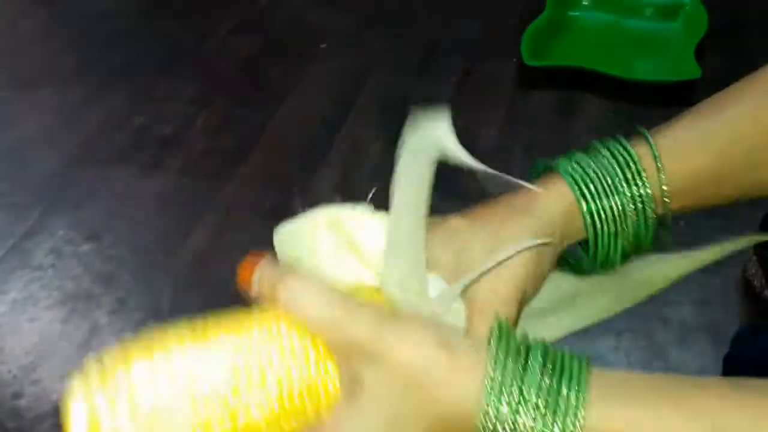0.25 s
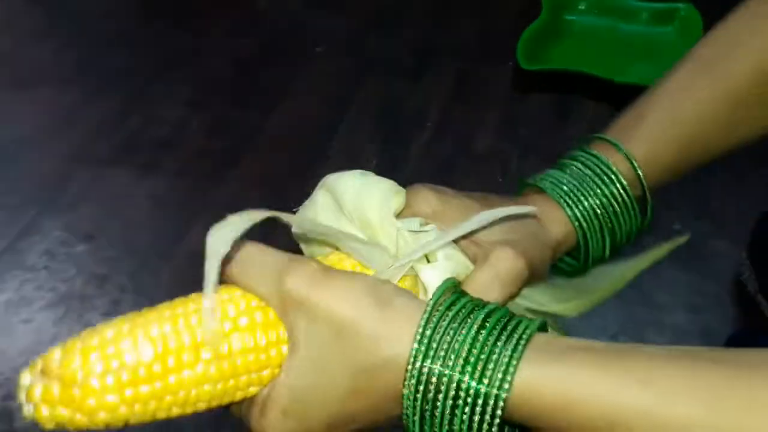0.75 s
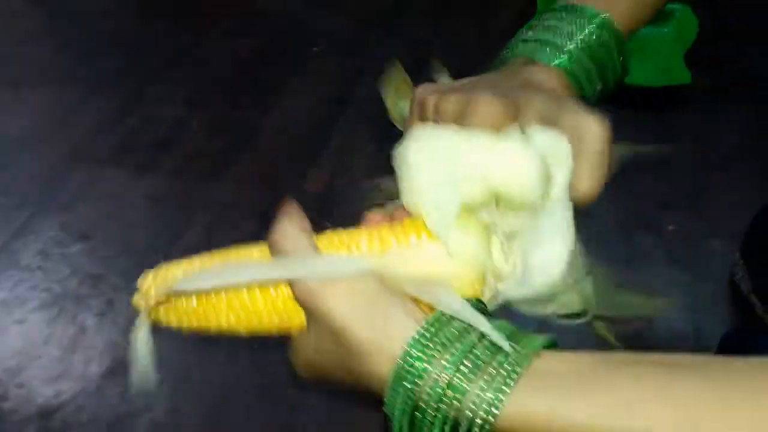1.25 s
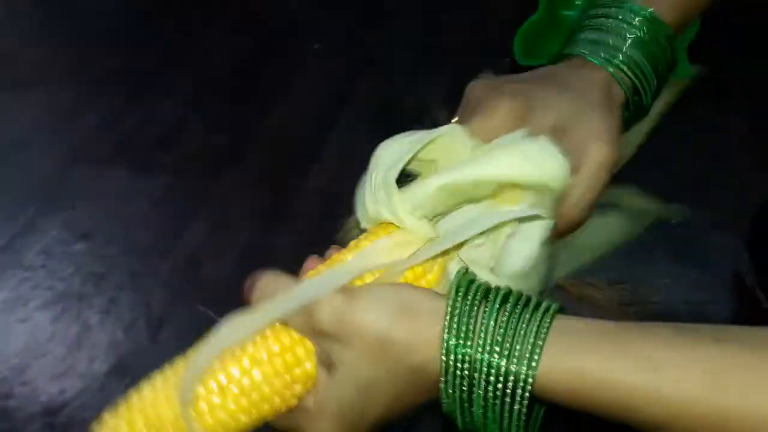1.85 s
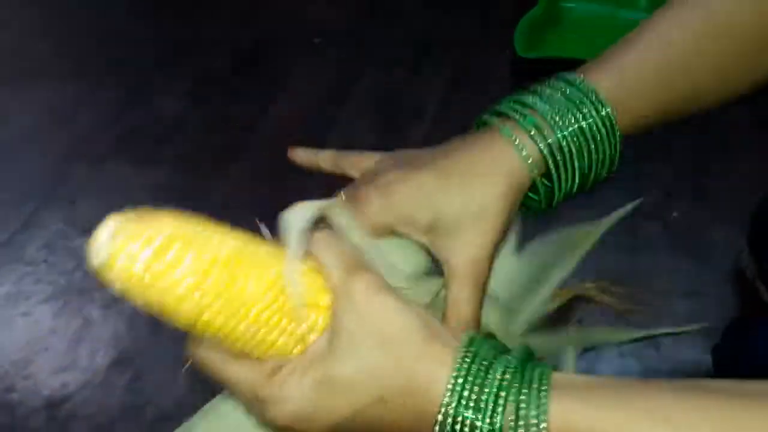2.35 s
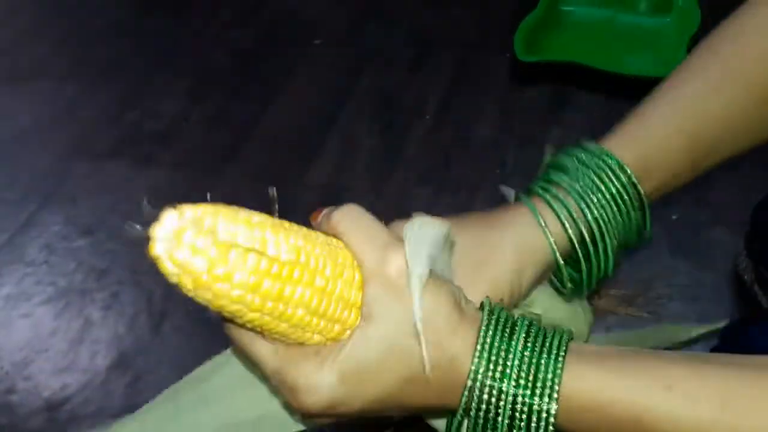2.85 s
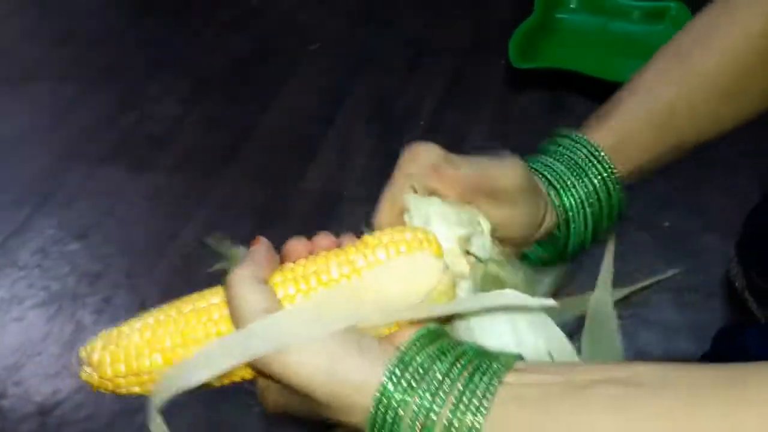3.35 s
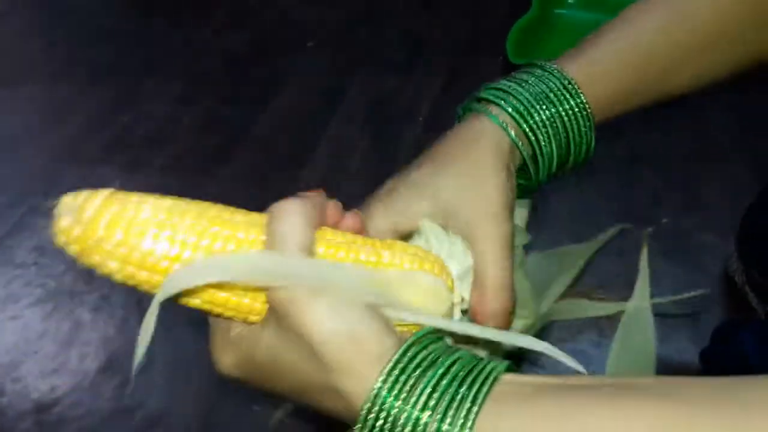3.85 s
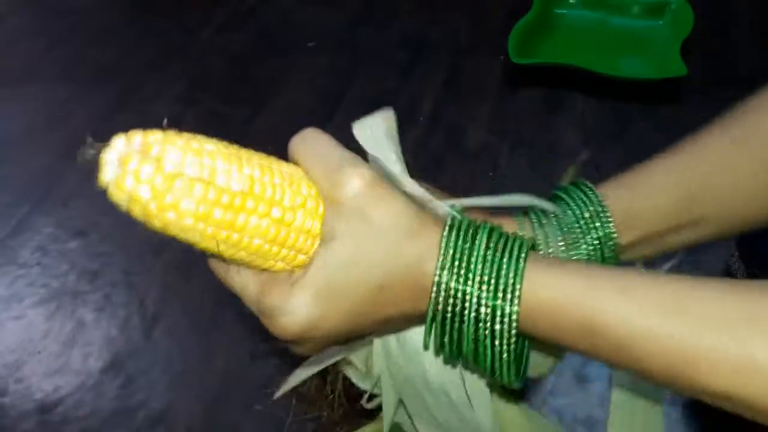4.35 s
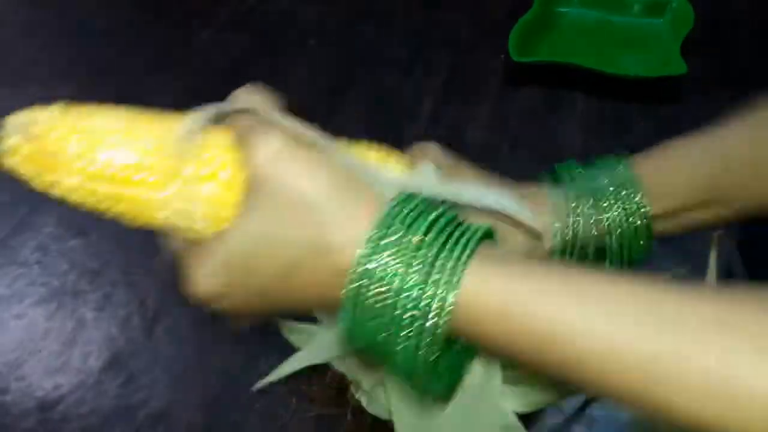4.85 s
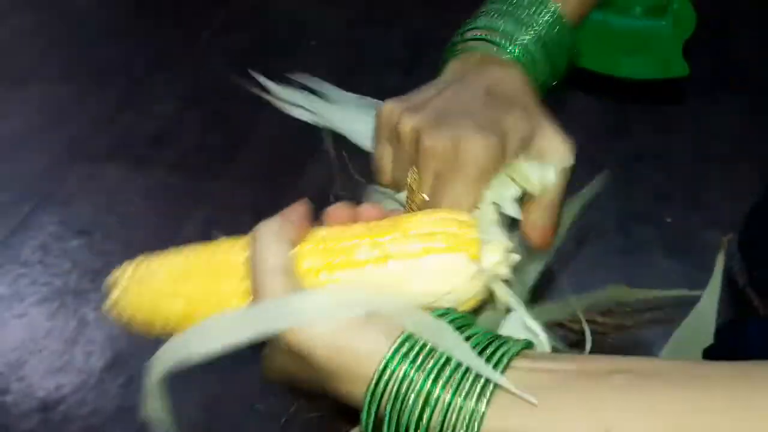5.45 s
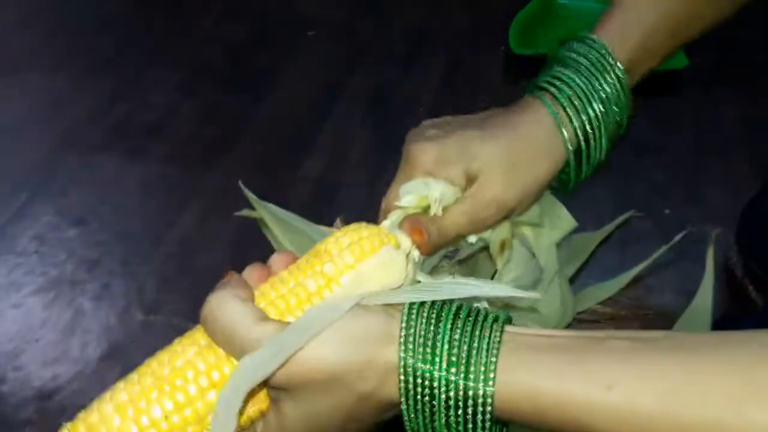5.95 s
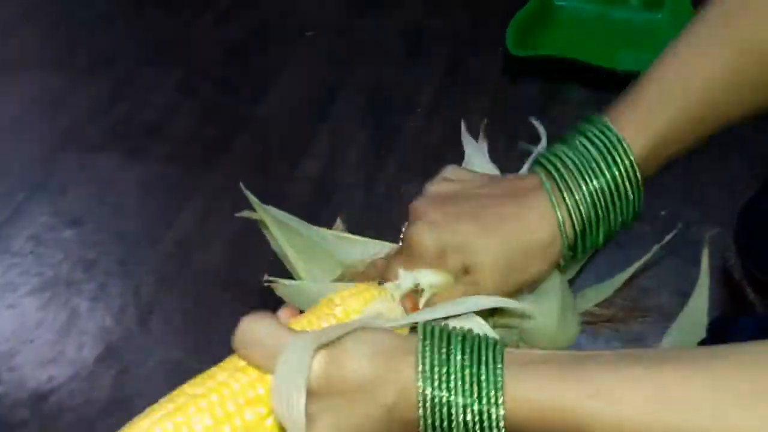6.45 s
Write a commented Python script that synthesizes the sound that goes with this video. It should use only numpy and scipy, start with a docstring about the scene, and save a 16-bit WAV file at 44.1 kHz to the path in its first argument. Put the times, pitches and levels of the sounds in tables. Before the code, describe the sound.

Hands strip husk from a corn cob in a hard-floored room: dry rustling, cracking ribs, short tears, leafy squeaks, light glass bangle ticks.

```python
"""In a hard-floored room, close by, hands pull the husk leaves off an ear of corn.
Crackling noise makes the leaves rustle, and noise around one pitch makes the squeezed bundle resonate.
Short noise bursts are snapping ribs, dense clicks are ripping fibres, unsteady tones are squeaking leaves.
Glass bangles ring on the wrists, filtered noise thuds in the cob, and echoes and a soft hush fill the room."""
import sys
import numpy as np
from scipy import signal
from scipy.fft import rfft, irfft
from scipy.io import wavfile

SR = 44100
rng = np.random.default_rng(int(sys.argv[2]) if len(sys.argv) > 2 else 0)


def file_out(sig):
    """Save sig as 16-bit WAV at sys.argv[1]."""
    # one column per channel
    cols = np.atleast_2d(sig).T
    # limit, then scale
    lim = np.clip(cols, -1, 1)
    pcm = np.round(lim * 32767).astype(np.int16)
    wavfile.write(sys.argv[1], SR, pcm)


N = 295029
TIME = np.arange(N) / SR

# All event levels below are relative: each source also has an overall level of its own.
# a hand pulls or gathers the leaves: start_s, length_s, crackle_db, rub_db, swell_db (change over the length)
STROKES = [(0, 0.098, -55, -45.5, -1), (0.163, 0.062, -41.5, -39.5, -7), (0.228, 0.16, -48.5, -43.5, 0),
           (0.361, .1, -38, -39, -1), (0.489, .29, -48, -44, 0), (0.873, 0.056, -52.5, -51, 0),
           (1.021, 0.28, -50.5, -47.5, -28), (1.367, 0.14, -47.5, -52, 4), (1.503, 0.064, -42, -44, 2),
           (1.6, 0.13, -49.5, -53.5, 3), (1.707, 0.066, -41, -44, -1), (1.865, .28, -54.5, -54.5, 1),
           (2.31, 0.74, -53, -53.5, -4), (2.686, 0.22, -37, -43, 0), (2.985, 0.079, -49.5, -47.5, -2),
           (3.069, 0.22, -43.5, -47, -13), (3.303, 0.14, -48, -47, -4.5), (3.517, .12, -51.5, -52, -1),
           (3.635, .04, -45.5, -46, -7), (3.873, 0.12, -43.5, -51.5, 7.5),
           (3.991, 0.19, -40.5, -48.5, -5.5), (4.25, 0.077, -36.5, -63, -14), (4.41, .2, -42.5, -55, 1),
           (4.63, .11, -50.5, -54, -8), (4.887, .34, -43.5, -51, 1.5), (5.508, 0.098, -57, -61.5, -4),
           (5.83, .12, -54, -77, 5.5), (6.385, 0.053, -43.5, -70, 0), (6.567, 0.014, -40, -53, -5)]
STROKE_ATTACK_S, STROKE_RELEASE_S = 0.017, 0.026
# leaves shifting in the grip between pulls: time_s, rub_db
GRIP = [(0, -43.5), (.9, -57), (1.85, -64), (2.7, -51.5), (3.7, -55), (4.4, -57), (5.35, -56), (5.45, -91),
        (6.1, -75), (6.4, -57), (6.68, -57)]
GRIP_CRACKLE_DB = -1.5  # relative to that rub
# how far the work has gone, from thick soft husk (0) to bare brittle stalk (1): time_s, share (0-1)
BARENESS = [(0, 0.11), (1.2, .03), (3.1, 0.27), (5.3, 0.3), (5.9, 0.74), (6.6, 1)]
# fine fibres splitting, relative to the crackle, and how much is added at the bare stalk
FIZZ_DB, BARE_FIZZ_DB = -14, 6.5
# spectrum of crackling leaves: pitch_hz, level_db (per Hz)
CRACKLE_SPECTRUM = [(100, -43), (500, -23.5), (1000, -19.5), (1500, -16), (2600, -9), (4000, -8.5),
                    (5500, -3.5), (6500, 1.5), (7200, -8.5), (8000, -22.5), (9000, -33), (16000, -36.5)]
# spectrum of leaf rubbing on leaf: pitch_hz, level_db (per Hz)
RUB_SPECTRUM = [(60, -17.5), (200, -6.5), (600, -7), (950, -6.5), (1250, 2), (1480, 1), (1900, -1.5),
                (2800, -1.5), (4000, -6), (6500, -31), (8000, -19), (16000, -34.5)]
# the thick bundle of leaves resonating as it is squeezed: start_s, length_s, level_db, pitch_hz
SQUEEZES = [(0, 0.23, -52.5, 1472), (0.198, 0.22, -43.5, 1422), (.48, 0.35, -48, 1419),
            (0.925, .14, -47.5, 1440), (1.355, 0.16, -50, 1339)]
# ribs and stalk breaking: start_s, level_db, thickness (0-1)
SNAPS = [(0.3593, -31, 0.6), (0.363, -35, 0.9), (0.444, -34, 0.6), (.571, -33.5, 0.73), (0.648, -37, .75),
         (0.688, -33, 0.64), (0.7294, -38.5, 0.93), (0.9145, -38.5, 0.63), (1.0373, -15.5, 0.99),
         (1.0543, -28, 1), (1.4653, -35.5, .05), (1.5197, -34.5, 0.7), (1.6664, -31, 0.7),
         (2.705, -35.5, .05), (2.7346, -26.5, 0.2), (2.7711, -24.5, .02), (2.9876, -33, 0.5),
         (3.0777, -25, 0.5), (3.1118, -14, .8), (3.1279, -28.5, 1), (3.1727, -17.5, 0.62),
         (3.1962, -24, 0.78), (3.3125, -34.5, 0.1), (3.333, -40, 0.1), (3.972, -27, 0), (3.999, -27.5, 0.6),
         (4.0731, -34.5, 0.6), (4.12, -34.5, 0.5), (4.142, -26, 0.1), (4.156, -35, 0.05),
         (4.249, -22.5, .5), (4.279, -41, 0), (4.292, -28, 0.2), (4.3144, -26, .02), (4.4228, -29.5, .5),
         (4.533, -37.5, .4), (4.568, -28, 0.24), (4.8894, -28.5, 0.27), (5.0602, -21, 0.54),
         (5.0895, -20, 0.66), (5.148, -26, 0.4), (5.2974, -34, 0.2), (5.5618, -45, 0.35),
         (5.7803, -42.5, .05), (5.8357, -44, .25), (5.9253, -40.5, 0.3), (6.3944, -22, 0.75),
         (6.4114, -34, 0.1), (6.5633, -32, 0.74), (6.5664, -30.5, 0.74)]
# four registers of a snap: low_hz, high_hz, thin_db (thin fibre), thick_db (thick rib),
# bare_db (added at the bare stalk)
SNAP_BANDS = [(1157, 1820, -28.5, 2.5, -10.5), (2390, 5000, -14.5, -1, 4), (5250, 7130, 0.5, -2.5, 1),
              (8060, 14100, -15.5, -17.5, 8)]
# lesser fibres that give way at random during a pull, at a level relative to its crackle
SMALL_SNAPS_PER_S, SMALL_SNAP_THICKNESS = 7, 0.17
SMALL_SNAP_DB, SMALL_SNAP_SPREAD_DB = 5.5, 2
# a leaf tearing off at its base: start_s, length_s, level_db, fall_db (over the length),
# leaf_hz (resonance), width_hz (of the resonance), leaf_db (resonance level)
RIPS = [(1.054, 0.071, -19, 12.5, 1500, 288, -5.5), (3.112, 0.01, -34.5, 17, 2230, 910, 17),
        (3.124, 0.07, -27, 6.5, 2600, 1102, -0.5), (5.086, 0.043, -36.5, 17, 1176, 257, 2.5),
        (5.099, 0.047, -33.5, 1.5, 2820, 450, -13)]
# spectrum of tearing fibres: pitch_hz, level_db (per Hz)
TEAR_SPECTRUM = [(80, -15.5), (300, -23), (650, -8.5), (1000, -3.5), (1400, -14), (2000, 3.5), (2700, 4.5),
                 (4200, 1.5), (6000, 8.5), (6800, 3), (8000, -19), (10000, -12), (16000, -29)]
# knocks through the cob, from the hands or from a breaking rib: start_s, level_db, centre_hz,
# t60_s (time to fall by 60 dB)
BUMPS = [(.175, -46.5, 208, 0.099), (.185, -43, 676, 0.026), (0.299, -55, 212, 0.14), (.39, -54, 297, 0.09),
         (.515, -45, 706, 0.045), (1.036, -29, 540, 0.02), (1.04, -41, 280, 0.14), (1.056, -42, 480, 0.12),
         (1.667, -44, 614, 0.013), (3.111, -24.5, 630, 0.0081), (5.091, -39, 760, 0.024),
         (5.09, -43.5, 180, 0.055), (5.487, -57, 109, 0.054), (6.569, -36.5, 450, 0.015)]
# leaf slipping on leaf: start_s, length_s, first_hz and last_hz (slips per second), level_db,
# uneven (unsteadiness, 0-1), octave_db (overtone relative to the tone)
SQUEAKS = [(0.211, 0.05, 3965, 4090, -35.5, 0.01, -36), (0.24, 0.0606, 4900, 5230, -34.5, 0.14, -22),
           (0.802, 0.063, 3100, 3050, -47, .012, -28), (1.837, 0.096, 3035, 3010, -50.5, 0.025, -2),
           (2.478, 0.081, 4476, 4680, -39.5, 0.01, -29), (3.759, 0.096, 3454, 3310, -43, 0.03, 3),
           (4.263, 0.058, 2500, 1960, -41.5, 0.13, -5), (4.307, 0.14, 2966, 3170, -41.5, 0.04, -20),
           (6.14, 0.12, 3735, 3330, -44, 0.12, -12), (6.144, 0.059, 2920, 2755, -50, 0.04, -0.5),
           (6.175, 0.079, 4850, 4600, -36.5, 0.035, -44), (6.228, 0.068, 4190, 4110, -35, 0.01, -18),
           (6.198, 0.11, 3510, 3380, -47, 0.06, -17), (6.16, .13, 5840, 5640, -52, .12, -30),
           (6.218, 0.084, 3030, 2920, -44, 0, -8.5), (6.302, 0.031, 4160, 4320, -42, 0.2, -28),
           (6.364, 0.058, 3000, 2960, -49, 0.05, 1)]
# bangles jostling: start_s, length_s, level_db, lower_db (added to the lower modes)
JINGLES = [(0.007, 0.061, -59, 1), (0.098, 0.012, -45.5, -6), (.36, 0.15, -58, -6), (0.662, 0.023, -52, -8),
           (1.064, 0.045, -39, -4), (1.21, 0.079, -52, 1.5), (1.569, 0.056, -54, -9),
           (2.263, 0.015, -47.5, 5), (2.329, 0.023, -51, -2), (2.354, 0.01, -40.5, 5),
           (2.389, 0.071, -54, -7), (2.508, 0.074, -56.5, 2), (3.65, 0.011, -55, 11),
           (4.69, 0.075, -56, -5), (4.907, 0.14, -47.5, -2), (6.172, 0.18, -66.5, 7)]
# modes of a glass bangle, before each ring is detuned: pitch_hz, level_db, t60_s
BANGLE_MODES = [(2930, -11, 0.048), (5220, -4.5, 0.0097), (6190, 4, 0.027), (10100, -9, 0.014),
                (11100, -2.5, 0.056), (11900, -5, 0.032), (13300, -10, .02), (14100, -10, .02),
                (15200, -8, .015)]
# how long the room echoes at each pitch: pitch_hz, t60_s
ROOM_T60 = [(150, 0.56), (1500, 0.4), (4000, 0.45), (6500, 0.36), (14000, 0.5)]
# stereo width given to the echo tail: pitch_hz, level_db (per Hz)
TAIL_WIDTH = [(100, -11), (500, 12), (1200, -37), (5000, -44), (7200, -6), (8200, 11), (16000, 12)]
# spectrum of the room's hush: pitch_hz, level_db (per Hz)
ROOM_TONE = [(20, -13), (60, -16), (110, -2), (170, 2), (280, -5), (650, -3.5), (1300, -8.5), (2500, -12),
             (4500, -17), (6500, -12.5), (8000, -35), (16000, -23)]
# stereo width given to the hush: pitch_hz, level_db (per Hz)
TONE_WIDTH = [(20, -7), (60, -6), (150, -1.5), (400, -1.5), (900, -2), (2000, -6.5), (6000, -12.5),
              (9000, -31), (16000, -64)]
ROOM_TONE_DB = -56
CUTOFF_HZ = 16100


def from_db(db):
    """Turn decibels into a plain gain."""
    return 10 ** (np.asarray(db) / 20)


def rms_one(x):
    """Scale a sound to an average strength (rms) of one."""
    return x / np.sqrt(np.mean(x ** 2) + 1e-20)


def at_hz(points, hz):
    """Read a table on a log-frequency axis."""
    knots, values = np.transpose(points)
    return np.interp(np.log(np.maximum(hz, 1)), np.log(knots), values)


def band(x, low, high, order=2):
    """Keep only the pitches between low and high, in Hz."""
    sections = signal.butter(order, [low, high], "band", fs=SR, output="sos")
    return signal.sosfilt(sections, x + 1e-18)  # the tiny offset keeps silent stretches quick to compute


def ring(x, hz, t60):
    """One damped mode: struck by x, it rings at one pitch and falls by 60 dB in t60 seconds."""
    radius = from_db(-60 / (t60 * SR))
    angle = 2 * np.pi * hz / SR
    return signal.lfilter([1, 0, -1], [1, -2 * radius * np.cos(angle), radius * radius], x + 1e-18)


def colour(x, spectrum, size=2048):
    """Causal (minimum-phase) filter with the shape of the given spectrum and a power gain of one."""
    level_db = at_hz(spectrum, np.fft.rfftfreq(size, 1 / SR))
    cepstrum = irfft(np.log(from_db(level_db)))
    # folding the cepstrum forward in time makes the filter causal
    cepstrum[1:size // 2] *= 2
    cepstrum[size // 2 + 1:] = 0
    response = irfft(np.exp(rfft(cepstrum)))
    return signal.fftconvolve(x, response / np.linalg.norm(response))[:len(x)]


def drift(per_s, n):
    """Smooth chance with a spread of one, taking per_s new random values each second."""
    steps = np.arange(n) * per_s / SR
    return rms_one(np.interp(steps, np.arange(n), rng.standard_normal(n)))


def cracks(per_s, spread_db, n):
    """Clicks at random moments, most of them faint and a few strong, with an rms of one."""
    strength_db = spread_db * np.minimum(rng.exponential(1, n), 4)
    sizes = from_db(strength_db) * rng.choice([-1, 1], n)
    return rms_one(sizes * (rng.random(n) < per_s / SR))


def add(out, s, sound):
    """Mix a sound in at its time in seconds."""
    start = max(round(s * SR), 0)
    out[start:start + len(sound)] += sound[:N - start]


def stroke(s, length, swell_db=0):
    """Force of one hand movement: a quick rise, a hold that swells or sags, a release."""
    t = TIME - s
    rise = np.clip(t / STROKE_ATTACK_S, 0, 1)
    hold = from_db(swell_db * (np.clip(t / length, 0, 1) - .5))
    release = np.exp(-np.clip((t - length) / STROKE_RELEASE_S, 0, 20))
    return rise * hold * release


def bareness(s):
    """How far the work has gone at these times, from soft husk (0) to bare stalk (1)."""
    return np.interp(s, *np.transpose(BARENESS))


def rustle(crisp_db=-0.4, hollow_db=-2.5, clump_db=2.5):
    """Bending leaves crackle in clumps; leaf sliding over leaf gives a smoother, duller rub."""
    rub_force = from_db(np.interp(TIME, *np.transpose(GRIP)))
    crackle_force = from_db(GRIP_CRACKLE_DB) * rub_force
    # the stronger of grip and strokes wins at each moment
    for s, length, crackle_db, rub_db, swell_db in STROKES:
        force = stroke(s, length, swell_db)
        crackle_force = np.maximum(crackle_force, from_db(crackle_db) * force)
        rub_force = np.maximum(rub_force, from_db(rub_db) * force)

    clumps = from_db(clump_db * drift(160, N))
    crackle = rms_one(cracks(per_s=3000, spread_db=1.0, n=N) * clumps)
    fizz_gain = from_db(FIZZ_DB + BARE_FIZZ_DB * bareness(TIME))
    fizz = fizz_gain * rms_one(band(crackle, 8800, 17500, order=3))
    crisp = crackle_force * (colour(crackle, CRACKLE_SPECTRUM) + fizz)

    rub = cracks(per_s=6000, spread_db=1.5, n=N)
    hollow = rub_force * colour(rub, RUB_SPECTRUM)
    return from_db(crisp_db) * crisp + from_db(hollow_db) * hollow


def bundle(width_hz=130, bundle_db=-3.5):
    """Friction excites the hollow of the bunched leaves, whose pitch differs from squeeze to squeeze."""
    out = np.zeros(N)
    friction = rng.standard_normal(N) + 1j * rng.standard_normal(N)
    swell = signal.sosfilt(signal.butter(2, width_hz, fs=SR, output="sos"), friction)
    for s, length, level_db, hz in SQUEEZES:
        # shifting slow noise up in pitch gives a narrow band around hz
        resonance = rms_one(np.real(swell * np.exp(2j * np.pi * hz * TIME)))
        out += from_db(level_db + bundle_db) * stroke(s, length) * resonance
    return out


def snaps(t60=0.0063, rise=0.0011, hold=0.002, snap_db=-2.5, size=900):
    """A rib breaks as a volley of fibres within a few milliseconds; thickness shifts its tone."""
    out, t = np.zeros(N), np.arange(size) / SR
    volley = np.minimum(t / rise, 1) * from_db(-60 * np.maximum(t - hold, 0) / t60)
    fibres = rng.standard_normal((len(SNAP_BANDS), N + size))
    for s, level_db, thickness in SNAPS + small_snaps():
        start = int(s * SR)
        for (low, high, thin_db, thick_db, bare_db), noise in zip(SNAP_BANDS, fibres):
            burst = band(noise[start:start + size] * volley, low, high, order=3)
            tone_db = thin_db + thickness * (thick_db - thin_db) + bare_db * bareness(s)
            gain = from_db(level_db + snap_db + tone_db)
            # scale the burst's energy as a mean over 4 ms
            strength = np.sqrt(np.sum(burst ** 2) / (.004 * SR))
            add(out, s, gain * burst / strength)
    return out


def small_snaps(count=4):
    """Each pull may break a few lesser fibres, the more the longer it lasts: rows like those of SNAPS."""
    rows = []
    for s, length, crackle_db, _, swell_db in STROKES:
        for (chance, along), luck in zip(rng.random((count, 2)), rng.standard_normal(count)):
            if chance < SMALL_SNAPS_PER_S * length / count:
                pull_db = crackle_db + swell_db * (along - .5)
                level_db = pull_db + SMALL_SNAP_DB + SMALL_SNAP_SPREAD_DB * luck
                rows.append((s + along * length, level_db, SMALL_SNAP_THICKNESS))
    return rows


def rips(release=0.027):
    """Dense random clicks make an even, falling tear, and noise around one pitch makes the leaf resonate."""
    out, t = np.zeros(N), np.arange(SR // 4) / SR
    for s, length, level_db, fall_db, leaf_hz, width_hz, leaf_db in RIPS:
        fibres = cracks(per_s=6000, spread_db=5.0, n=len(t))
        tugs = cracks(per_s=6000, spread_db=5.0, n=len(t))
        leaf = rms_one(band(tugs, leaf_hz - width_hz / 2, leaf_hz + width_hz / 2))
        # the steady fall goes on after the length, with a release on top
        pull = from_db(level_db - fall_db * t / length) * np.exp(-np.maximum(t - length, 0) / release)
        add(out, s, (colour(fibres, TEAR_SPECTRUM) + from_db(leaf_db) * leaf) * pull)
    return out


def bumps():
    """Short, dull thuds in the solid cob, each a band of pitches that dies quickly."""
    out, t = np.zeros(N), np.arange(SR // 5) / SR
    for s, level_db, hz, t60 in BUMPS:
        thud = rms_one(band(rng.standard_normal(len(t)), hz / 1.32, hz * 1.36))
        add(out, s, thud * from_db(level_db + 6.0) * from_db(-60 * t / t60))
    return out


def squeaks(flutter_db=4.5, squeak_db=-3, rasp_db=-10, top_hz=7100):
    """Moist leaves stick and slip thousands of times a second, unsteadily and with a rasp around the tone."""
    out, t = np.zeros(N), np.arange(SR // 5) / SR
    for s, length, first_hz, last_hz, level_db, uneven, octave_db in SQUEAKS:
        along = np.minimum(t / length, 1)
        wander = 0.67 * drift(1490, len(t)) + 0.8 * drift(300, len(t))
        slip_hz = (first_hz + (last_hz - first_hz) * along) * (1 + uneven * wander)
        phase = 2 * np.pi * np.cumsum(slip_hz) / SR
        flutter = from_db(flutter_db * drift(389, len(t)))
        rasp = from_db(rasp_db) * drift(1300, len(t))
        tone = np.sin(phase) + from_db(octave_db) * np.sin(2 * phase)
        fade = np.abs(np.sin(np.pi * along)) ** 0.29  # in and out, full in between
        add(out, s, from_db(level_db + squeak_db) * tone * (flutter + rasp) * fade)
    return band(out, 1480, top_hz, order=8)


def bangles(detune=0.018, low_modes_hz=8000, count=3):
    """Rings of slightly different sizes knock together many times in each longer shake of the wrist."""
    out, t = np.zeros(N), np.arange(SR // 4) / SR
    for s, length, level_db, lower_db in JINGLES:
        knocks = cracks(per_s=410, spread_db=5.5, n=len(t)) * (t < length)
        knocks[0] = np.abs(knocks).max() + 1  # every shake starts with a knock
        for hz, mode_db, t60 in BANGLE_MODES:
            glass = np.zeros(len(t))
            for _ in range(count):
                hits = knocks * rng.standard_normal(len(t))
                ring_hz = hz * (1 + detune * rng.standard_normal())
                glass += ring(hits, ring_hz, t60)
            gain = from_db(level_db + mode_db + lower_db * (hz < low_modes_hz) - 1.5)
            # longer shakes carry more energy
            add(out, s, gain * rms_one(glass) * np.sqrt(length / t[-1]))
    return out


def room(dry, wet_db, width_db, gap=0.0026, size=32768):
    """Many blurred echoes, made of noise, die away band by band, with some stereo width added."""
    t, edges = np.arange(size) / SR, np.geomspace(60, 18000, 10)
    tails = np.zeros((2, size))
    for low, high in zip(edges, edges[1:]):
        decay = from_db(-60 * t / at_hz(ROOM_T60, np.sqrt(low * high)))
        tails += band(rng.standard_normal((2, size)), low, high) * decay
    tails *= t > gap  # the echoes start a moment after the direct sound
    tails *= from_db(wet_db) / np.linalg.norm(tails[0])
    mid = signal.fftconvolve(dry, tails[0])[:N]
    side_tail = from_db(width_db) * colour(tails[1], TAIL_WIDTH)
    side = signal.fftconvolve(dry, side_tail)[:N]
    return dry + mid + side * np.array([[1], [-1]])


def room_tone(side_db=-14):
    """The room's steady low hush: filtered noise with some stereo width added."""
    mid = colour(rng.standard_normal(N), ROOM_TONE)
    side = colour(rng.standard_normal(N), TONE_WIDTH)
    return from_db(ROOM_TONE_DB) * (mid + from_db(side_db) * side * np.array([[1], [-1]]))


def scene():
    """Squeaks and bangles, shaded by the hands, arrive more by way of the room."""
    near = rustle() + bundle() + snaps() + rips() + bumps()
    shaded = squeaks() + from_db(-2) * bangles()
    near_in_room = room(near, wet_db=-6.0, width_db=-15.5)
    shaded_in_room = room(shaded, wet_db=-1, width_db=-24)
    return near_in_room + shaded_in_room + room_tone()


def record(dry, dip_hz=8050, dip_q=10):
    """A narrow notch in the treble, then a steep cut at the top."""
    notched = signal.lfilter(*signal.iirnotch(dip_hz, dip_q, fs=SR), dry)
    return signal.sosfilt(signal.ellip(10, .2, 80, CUTOFF_HZ, fs=SR, output="sos"), notched)


dry = scene()
out = record(dry)
file_out(out)
```